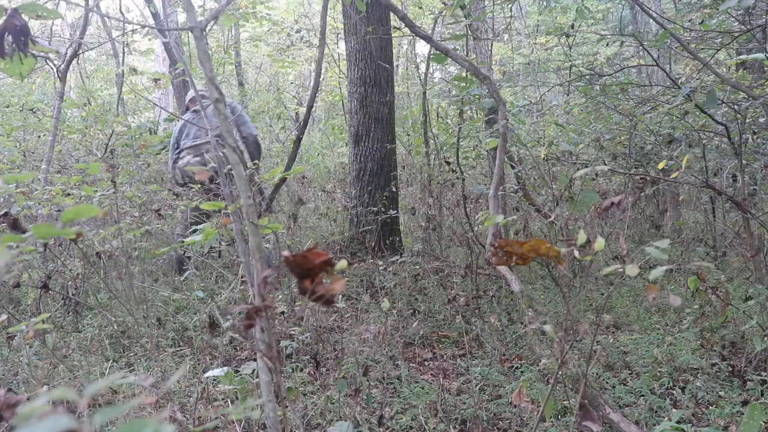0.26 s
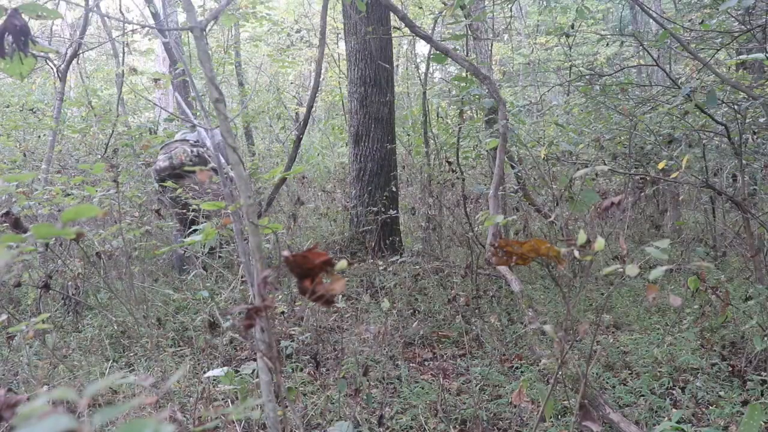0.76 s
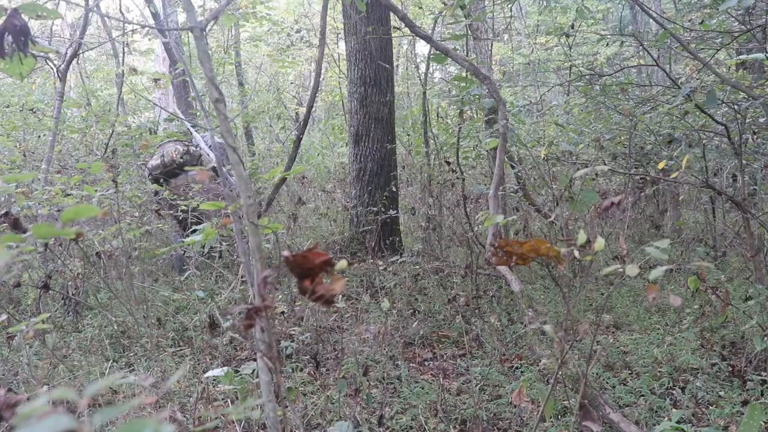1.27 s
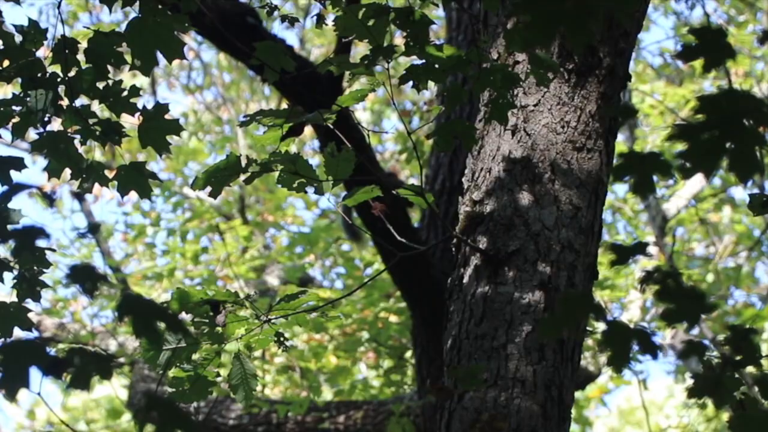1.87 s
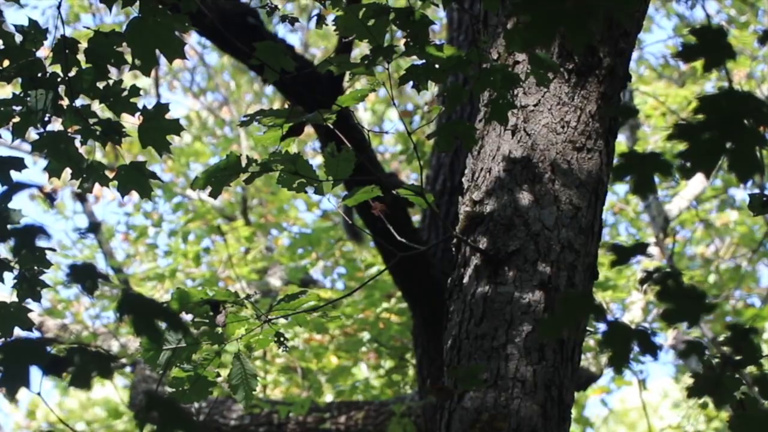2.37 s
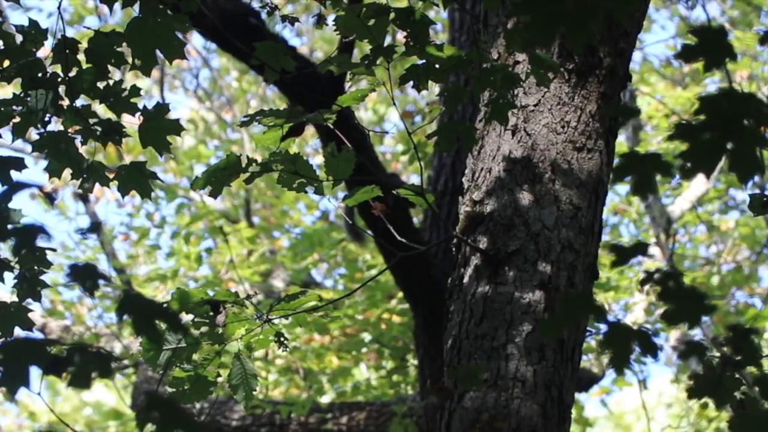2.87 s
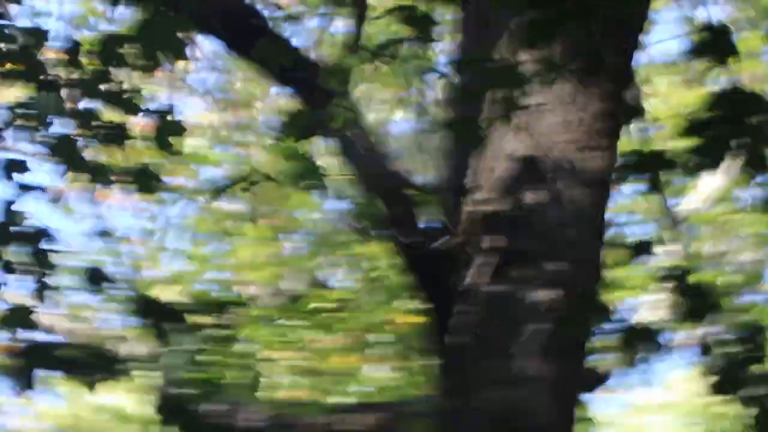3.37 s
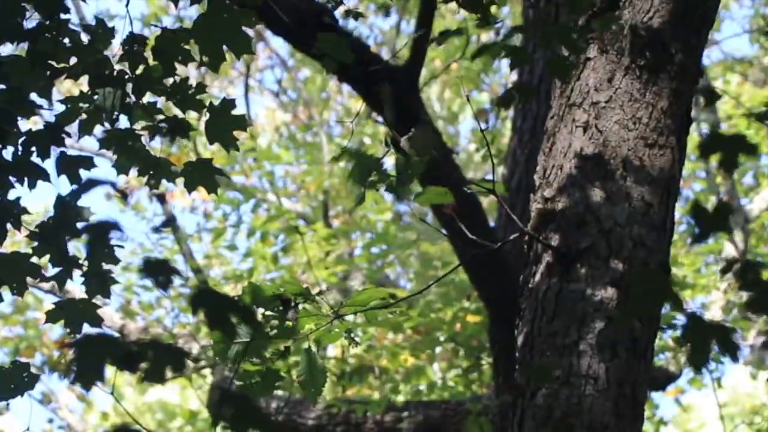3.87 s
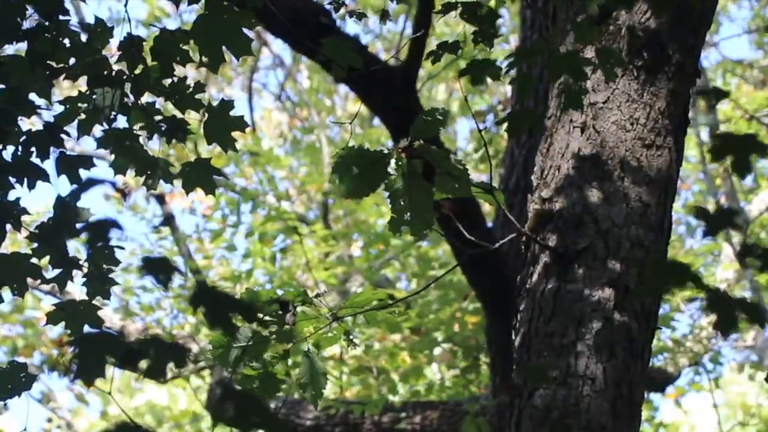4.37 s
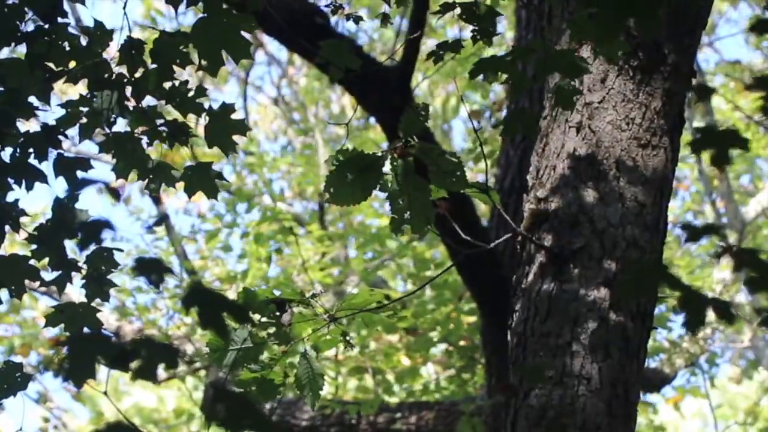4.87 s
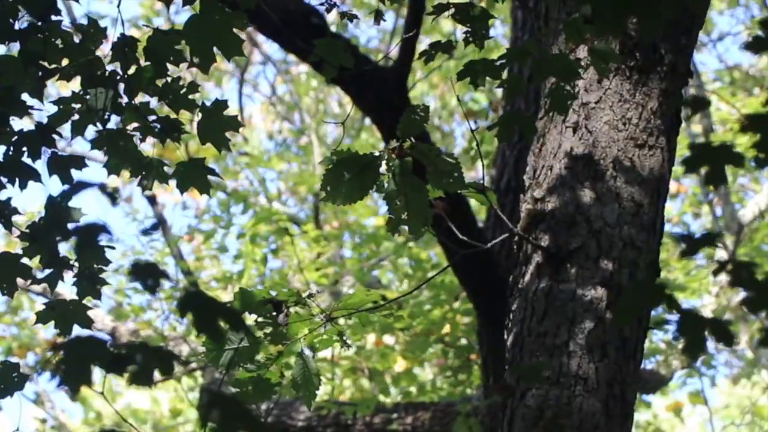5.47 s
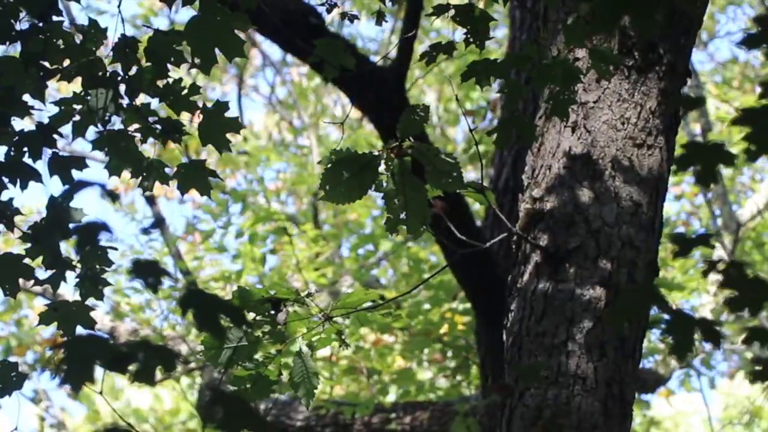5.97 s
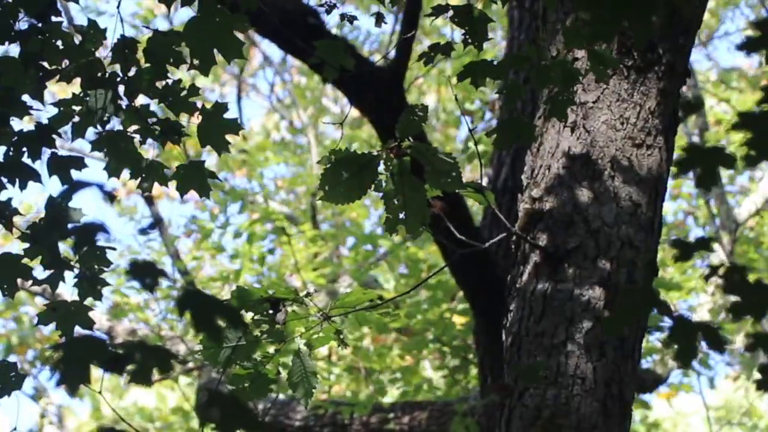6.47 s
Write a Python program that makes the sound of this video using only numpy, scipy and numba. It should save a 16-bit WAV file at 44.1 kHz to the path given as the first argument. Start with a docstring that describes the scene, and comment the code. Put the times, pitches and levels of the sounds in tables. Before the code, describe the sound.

From 0 s, quiet woodland air with a thin high cricket trill around 5.5 kHz, near chirps about four a second and a fainter, slower, lower singer. Dry leaves rustle at 0.1 s; twigs snap near 0.1, 0.45, 0.8 and 1.1 s, some bright, some woody and low. At 1.65 s the crickets stop abruptly, replaced by soft, darker air; a faint far whistle falls from 2.1 to 2.4 s. At 3.33 s a tiny crack leads straight into one close, violent shotgun blast with heavy low thumps, clipped and ducked by the microphone. Rapid trunk echoes and a steel clack at 3.5 s follow. The forest's dense answer swells and rolls away, treble fading first, mid-low rumble lingering to the end. At 5.65 s a heavy step thuds in leaves with twig snaps; another step and snaps come at 6.5 to 6.7 s.

```python
"""One shotgun blast close by, in quiet autumn woods: shaped noise with low pressure pushes and echoes off trunks.
Thousands of tiny returns make the forest's answer, which rolls away losing its treble first.
Around it are crickets (sine chirps and narrow noise) up to a cut, twigs and steps in dry leaves (rings and
crackling noise) and, after the cut, a far bird (a gliding sine).
The blast overloads the microphone: its gain control ducks and creeps back."""
import sys
import numpy as np
from scipy import signal
from scipy.fft import rfft, irfft, next_fast_len
from scipy.io import wavfile
from scipy.ndimage import map_coordinates
from numba import njit

SR = 44100
rng = np.random.default_rng(int(sys.argv[2]) if len(sys.argv) > 2 else 0)


def wav_out(sig):
    """Save sig, one row per channel (or a flat mono array), as 16-bit PCM at SR to the path in sys.argv[1]."""
    wavfile.write(sys.argv[1], SR, np.round(np.clip(np.atleast_2d(sig).T, -1, 1) * 32767).astype(np.int16))


N = 296087

# All levels stand ahead of the microphone's gain control.
# Colours of still air and microphone hiss. Each row: frequency in Hz, relative level in dB per Hz.
THICKET_AIR = [(25, -2), (90, 3.5), (300, 0), (1000, -2.5), (1600, -6), (3000, -7.5), (4500, -10.5),
               (8000, -13), (15000, -16)]
CANOPY_AIR = [(15, -35), (25, 0.5), (198, -0.5), (267, -2), (389, -2.5), (421, -4.5), (684, -5), (1450, -8),
              (1660, -10), (1800, -8.5), (15500, -20)]
# Pitch of a cricket's chirp. Each row: time into the chirp in seconds, pitch in Hz.
CHIRP_PITCH = [(0, 5400), (.015, 5530), (.03, 5500), (.055, 5280)]
# Steady beat of each cricket. The row: first chirp in seconds, period in seconds, level in dB.
NEAR_CRICKET = (0.186, 0.2395, -41.5)
SECOND_CRICKET = (1.075, 0.225, -48.5)
FAR_CRICKET = (0.31, 0.367, -61)
# One far whistle. Each row: time in seconds, pitch in Hz.
BIRD_PITCH = [(2.06, 3290), (2.2, 3000), (2.42, 2560)]
# Twigs snapping underfoot. Each row: start in seconds, level in dB, pitch in Hz.
TWIGS = [(0.0857, -27.5, 1180), (0.122, -34, 2900), (0.445, -32, 350), (0.804, -28, 880), (1.102, -39, 390),
         (5.635, -34, 3270), (5.778, -39, 3300), (6.518, -38, 3140), (6.6722, -31, 1930)]
# Colour of breaking wood. Each row: frequency in Hz, relative level in dB per Hz.
SPLINTER_COLOUR = [(300, -20), (800, -14), (1600, 12), (2000, -18), (3000, 7), (4500, -6), (12000, -24)]
# Steps in dry leaves. Each row: peak time in seconds, level in dB, rise in seconds, fall in seconds.
STEPS = [(.11, -43.5, 0.16, 0.14), (5.675, -42, 0.04, 0.071), (6.67, -43, 0.034, 0.065)]
# Colour of crushed leaves. Each row: frequency in Hz, relative level in dB per Hz.
LEAF_COLOUR = [(200, 9), (900, 14), (1800, 9), (3200, 11.5), (6000, 3.5), (10000, -4.5), (15000, -8)]
# Clacks of the gun's action. Each row: start in seconds, relative level in dB.
CLACKS = [(3.5046, 7), (3.509, 2)]
# Ringing modes of its steel parts. Each row: frequency in Hz, width in Hz, relative level in dB.
STEEL_MODES = [(1100, 460, 0), (1850, 470, 7), (4500, 2300, -11.5), (11900, 2500, -18.5), (15150, 110, -8)]
# Colours of the nearby undergrowth and the far forest. Each row: frequency in Hz, relative level in dB per Hz.
NEAR_COLOUR = [(30, -16), (150, -3), (400, 7.5), (1100, 13), (1500, 1.5), (2700, 8.5), (4500, 3.5),
               (8000, -5), (15000, -13.5)]
FAR_COLOUR = [(25, -29), (60, -28), (100, -17.5), (160, -8), (260, 1.5), (550, -1), (850, 3.5),
              (1230, -0.5), (1430, -6), (2000, -5), (2800, -1), (4200, -4), (7000, -18.5), (13000, -27)]
# How fast these two die away. Each row: frequency in Hz, time to fall by 60 dB in seconds.
NEAR_DECAY = [(60, 0.3), (400, 0.48), (1500, 0.48), (4000, 0.32), (12000, 0.28)]
FAR_DECAY = [(60, 3.8), (280, 4.84), (600, 4.1), (1050, 3.59), (1600, 2.61), (2400, 1.84), (4000, 1.236),
             (7000, 1.1), (13000, 0.65)]
# Colours of the blast and of an echo off a trunk. Each row: frequency in Hz, relative level in dB per Hz.
BLAST_COLOUR = [(30, -11), (150, -17), (400, -1.5), (750, 1.5), (1130, 5.5), (1450, -2), (2600, -3.5),
                (5000, -20), (9000, -52), (15000, -38)]
TRUNK_COLOUR = [(30, -31), (120, -38), (250, -1), (450, 9.5), (800, 0), (1150, 6.5), (1500, -2),
                (2600, -28), (5000, -40), (9000, -65), (15000, -66)]
# Low pressure pushes of the blast. Each row: start in seconds, level in dB.
PUSHES = [(3.349, -3), (3.37, 10.5), (3.414, 17.5), (3.418, 8), (3.927, -16)]
# Distinct echoes off single trunks. Each row: start in seconds, level in dB.
ECHOES = [(3.372, 12), (3.401, 16.5), (3.4405, 14.5), (3.463, 6), (3.515, 4), (3.566, 5.5), (3.692, 3),
          (4.094, -3.5), (4.928, -30)]

CRICKETS_END_S = 1.65  # a cut between two backgrounds
TWIG_CYCLES, OVERTONE_RATIO, OVERTONE_DB = 1.43, 1.6, -6  # life of the ring, and its second mode
SNAP_SHARE = 0.42  # splintering in a twig of 1 kHz; higher twigs splinter more
FOOTFALL_S, FOOTFALL_DB, FOOTFALL_SCALE_S = 5.686, -32, 0.002  # one heavy step thuds on the soil
CRACK_S, SHOT_S = 3.3295, 3.341
MUZZLE_DB, MUZZLE_T60_S = 23.5, 0.096
ECHO_T60_S = 0.038
ECHO_DULLING_S = 0.92  # the share of the blast's own colour in an echo falls 60 dB in this time
PUSH_SCALE_S = 0.0017  # pressure turns to suction after twice this time
# the far forest's answer swells as the blast reaches more trees, then thins as it spreads
FOREST_DB, SWELL_DB, SWELL_S = 4.5, 14.5, 0.42
THIN_DB, THIN_S = 4, 0.77
TOP_HZ = 15750  # middle of the microphone's treble cut


def amp(db):
    """Turn decibels into gain."""
    return 10 ** (np.asarray(db) / 20)


def unit(x):
    """Scale to an rms (average strength) of 1."""
    return x / np.sqrt(np.mean(x ** 2) + 1e-20)


def along(points, hz):
    """Read a (Hz, value) table between its rows, on a log frequency axis."""
    f, v = np.transpose(points)
    return np.interp(np.log(hz + 1), np.log(f + 1), v)


def clock():
    """Give the time of every sample in seconds."""
    return np.arange(N) / SR


def fade(s, t60):
    """Start suddenly at s and die exponentially, 60 dB in t60 seconds."""
    age = clock() - s
    return (age >= 0) * np.exp(-np.log(1000) * np.clip(age / t60, 0, 10))


def wobble(rate):
    """Draw a smooth random curve through a given number of random points a second."""
    points = rng.standard_normal(int(N * rate / SR) + 4)
    return map_coordinates(points, [np.arange(N) * rate / SR])


def filtered(x, response):
    """Multiply each frequency of x by the response there."""
    m = next_fast_len(N + SR // 4)
    return irfft(rfft(x, m) * response(np.fft.rfftfreq(m, 1 / SR)), m)[:N]


def coloured(x, colour):
    """Give x the colour of a table, at rms 1."""
    return unit(filtered(x, lambda f: amp(along(colour, f))))


def noise(colour):
    """Make steady coloured noise of rms 1."""
    return coloured(rng.standard_normal(N), colour)


def narrow(hz, half_width_hz):
    """Make noise in a narrow band, heard as a fuzzy tone, at rms 1."""
    return unit(filtered(rng.standard_normal(N), lambda f: 1 / (1 + ((f - hz) / half_width_hz) ** 4)))


def grains(per_second):
    """Scatter tiny impulses of unequal size at random moments, at rms 1."""
    return unit(rng.standard_normal(N) * (rng.random(N) < per_second / SR))


def push(s, scale_s):
    """A low pressure wave: overpressure, then suction."""
    u = np.clip((clock() - s) / scale_s, 0, 20)
    return 2 * u * (2 - u) * np.exp(-u)


def burst(envelope, colour):
    """Shape noise in time, then colour it causally so that its onset is no brighter than its body."""
    def response(f):
        gain = unit(amp(along(colour, f)))
        # the cepstrum, folded to positive times, gives a filter that never sounds ahead of its input
        cepstrum = irfft(np.log(gain))
        return np.exp(rfft(2 * cepstrum[:len(f) - 1], len(cepstrum)) - cepstrum[0])
    return filtered(envelope * rng.standard_normal(N), response)


def beats(cricket, count):
    """List the time and level of a cricket's evenly spaced chirps."""
    first_s, period_s, db = cricket
    return [(first_s + k * period_s, db) for k in range(count)]


def crickets():
    """Two near crickets' arched chirps, over a steady trilling chorus and a slower far singer."""
    t = clock()
    out = amp(-56) * narrow(hz=5490, half_width_hz=340)
    far_pulses = sum(amp(db) * np.exp(-((t - s) / 0.11) ** 2) for s, db in beats(FAR_CRICKET, count=4))
    out += far_pulses * narrow(hz=3580, half_width_hz=165)

    age = t[:int(CHIRP_PITCH[-1][0] * SR)]
    pitch = np.interp(age, *np.transpose(CHIRP_PITCH))
    phase = 2 * np.pi * np.cumsum(pitch) / SR
    swell = np.sin(np.pi * age / age[-1])
    flutter = wobble(250)  # the wing scrapes unevenly
    for s, db in beats(NEAR_CRICKET, count=7) + beats(SECOND_CRICKET, count=2):
        start = round(s * SR)
        span = slice(start, start + len(age))
        loudness = amp(db + 1.3 * flutter[span]) * swell
        out[span] += loudness * np.sin(phase + 0.2 * flutter[span])
    return out


def bird():
    """A far falling whistle: a gliding sine whose unsteady phase is the blur of the trees."""
    t = clock()
    swell = np.sqrt(np.interp(t, [BIRD_PITCH[0][0], BIRD_PITCH[1][0], BIRD_PITCH[-1][0]], [0, 1, 0]))
    phase = 2 * np.pi * np.cumsum(np.interp(t, *np.transpose(BIRD_PITCH))) / SR
    return amp(-56.5) * swell * np.sin(phase + 2.1 * wobble(220))


def leaf_steps():
    """Steps crush dry leaves: each press swells and fades over crackling noise."""
    t = clock()
    press = 0
    for s, db, rise, fall in STEPS:
        distance = np.maximum((s - t) / rise, (t - s) / fall)
        press = press + amp(db) * np.exp(-distance.clip(0, 20))
    crackle = grains(per_second=1800) + rng.standard_normal(N)
    return press * coloured(crackle, LEAF_COLOUR)


def woody_ring(cycles):
    """A sine that dies away within a few cycles, as wood rings."""
    return np.sin(2 * np.pi * cycles) * np.exp(-cycles / TWIG_CYCLES)


def twigs():
    """Twigs snap: splintering noise with a short woody ring in two modes."""
    out = np.zeros(N)
    splinters = noise(SPLINTER_COLOUR)
    for s, db, hz in TWIGS:
        start = round(s * SR)
        span = slice(start, start + SR // 20)
        age = np.arange(len(out[span])) / SR
        wood = woody_ring(hz * age) + amp(OVERTONE_DB) * woody_ring(OVERTONE_RATIO * hz * age)
        snap = SNAP_SHARE * np.sqrt(hz / 1000) * np.exp(-age / 0.0013)
        out[span] += amp(db) * (wood + snap * splinters[span])
    return out


def underfoot():
    """Steps in leaves, snapping twigs and one heavy step that pushes a thud out of the soil."""
    return leaf_steps() + twigs() + amp(FOOTFALL_DB) * push(FOOTFALL_S, FOOTFALL_SCALE_S)


def action():
    """Steel parts of the gun slam home: short noisy blows ring the modes of the metal."""
    blows = sum(amp(db) * fade(s, 0.014) for s, db in CLACKS) * rng.standard_normal(N)

    def steel(f):
        total = 0
        for k, (hz, width, db) in enumerate(STEEL_MODES):
            mode = 1j * f * width / (hz * hz - f * f + 1j * f * width)
            total = total + (-1) ** k * amp(db) * mode  # neighbouring modes have opposite signs
        return total
    return amp(13.5) * filtered(blows, steel)


def scatter(colour, decay, per_second):
    """Countless returns of the blast; air and foliage absorb each frequency at its own speed."""
    returns = coloured(grains(per_second), colour)
    hz, t, z = signal.stft(returns, SR, nperseg=1024)
    age = np.maximum(t - SHOT_S, 0)
    loss = np.exp(-np.log(1000) * age / along(decay, hz)[:, None])
    return signal.istft(z * loss, SR, nperseg=1024)[1][:N] * (clock() >= SHOT_S)


def forest():
    """The undergrowth answers at once; the far trees swell up behind it and roll away."""
    near = amp(16) * scatter(NEAR_COLOUR, NEAR_DECAY, per_second=12000)
    age = clock() - SHOT_S
    swell_db = -SWELL_DB * np.clip(1 - age / SWELL_S, 0, 1)
    thin_db = -THIN_DB * np.clip((age - SWELL_S) / THIN_S, 0, 1)
    clumps_db = 0.65 * wobble(25) + 0.23 * wobble(150)  # returns come in clumps
    far_gain = amp(FOREST_DB + swell_db + thin_db + clumps_db)
    return near + far_gain * scatter(FAR_COLOUR, FAR_DECAY, per_second=11000)


def blast():
    """The pellets' crack runs just ahead of the muzzle blast, its echoes off trunks and its pressure pushes."""
    t = clock()
    crack_rise = np.clip((t - CRACK_S) / 0.0028, 0, 1) ** 2
    crack = amp(-17.5) * crack_rise * (t < SHOT_S) * noise(NEAR_COLOUR)
    muzzle = amp(MUZZLE_DB) * fade(SHOT_S + 0.001, MUZZLE_T60_S)
    echoes = sum(amp(db) * fade(s, ECHO_T60_S) for s, db in ECHOES)
    arrivals = muzzle + echoes
    direct = fade(SHOT_S, ECHO_DULLING_S)
    # later arrivals come off trunks, without deep bass or treble
    off_trunks = np.sqrt(1 - direct ** 2)
    bursts = burst(arrivals * direct, BLAST_COLOUR) + burst(arrivals * off_trunks, TRUNK_COLOUR)
    return crack + bursts + sum(amp(db) * push(s, PUSH_SCALE_S) for s, db in PUSHES)


def scene():
    """A cut at CRICKETS_END_S: thicket air and crickets before, canopy air and bird after; the rest is added."""
    thicket = amp(-50.5) * noise(THICKET_AIR) + crickets()
    canopy = amp(-49.5) * noise(CANOPY_AIR) + bird()
    woods = np.where(clock() < CRICKETS_END_S, thicket, canopy)
    return (woods + underfoot() + blast() + action() + forest())[None]


@njit
def auto_gain(x, target, deepest, attack, release):
    """The gain drops quickly while peaks pass the target, then creeps back to 1."""
    out, gain = np.empty_like(x), 1.0
    for i in range(len(x)):
        out[i] = x[i] * gain
        if abs(out[i]) > target:
            gain = max(deepest, gain + (target / abs(x[i]) - gain) * attack)
        else:
            gain = min(1.0, gain * release)
    return out


def levelled(x, target_db, range_db, attack_s, recover_db_per_s):
    """Run one stage of gain control, turning its settings into steps per sample."""
    target, deepest = float(amp(target_db)), float(amp(-range_db))
    return auto_gain(x, target, deepest, 1 / (attack_s * SR), float(amp(recover_db_per_s / SR)))


def record(dry):
    """A slowly recovering gain control ducks, the converter clips, a faster recovering limiter follows."""
    ducked = levelled(dry[0], target_db=-1.0, range_db=15, attack_s=0.001, recover_db_per_s=11.5)
    clipped = np.clip(ducked, -1, 1)
    limited = levelled(clipped, target_db=-7, range_db=8, attack_s=0.005, recover_db_per_s=28)
    # deep bass and the top of the treble are cut
    coupling_hz = 30
    low_cut = lambda f: 1j * f / (coupling_hz + 1j * f)
    high_cut = lambda f: np.clip((TOP_HZ - f) / 300 + 0.5, 0, 1)
    return filtered(limited, lambda f: low_cut(f) * high_cut(f))[None]


dry = scene()
out = record(dry)
wav_out(out)
```